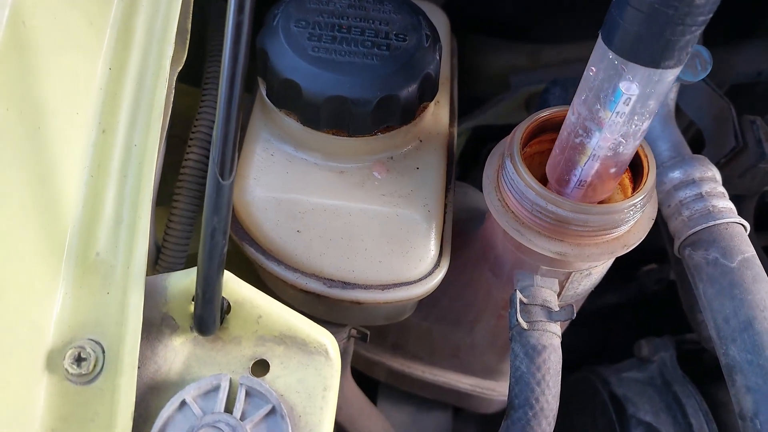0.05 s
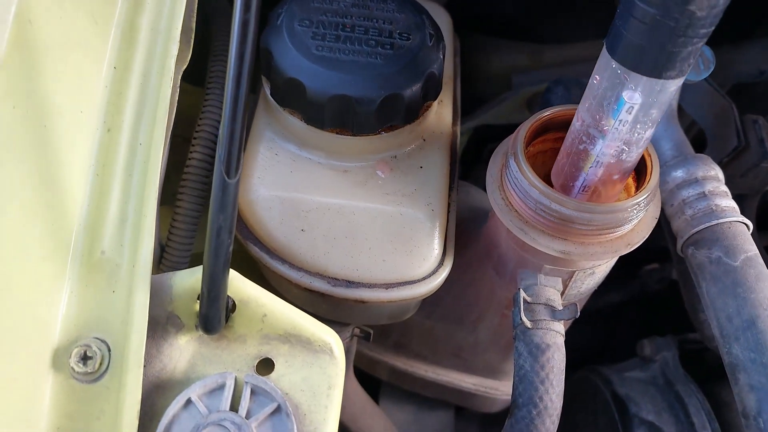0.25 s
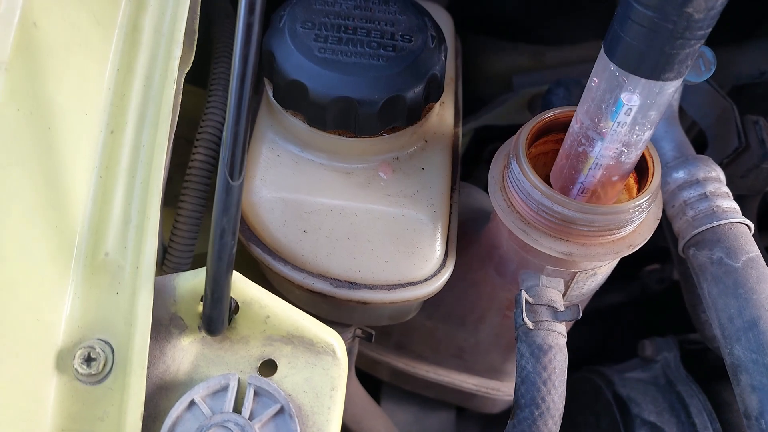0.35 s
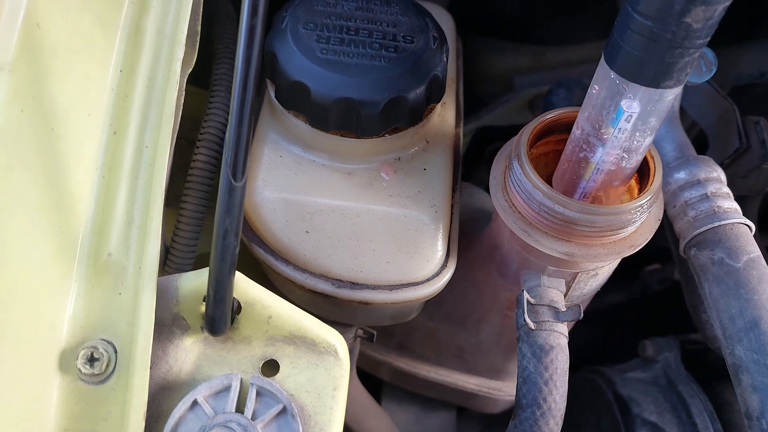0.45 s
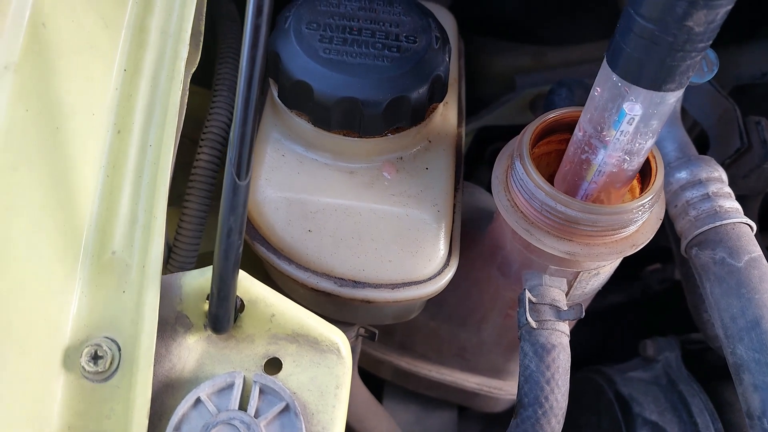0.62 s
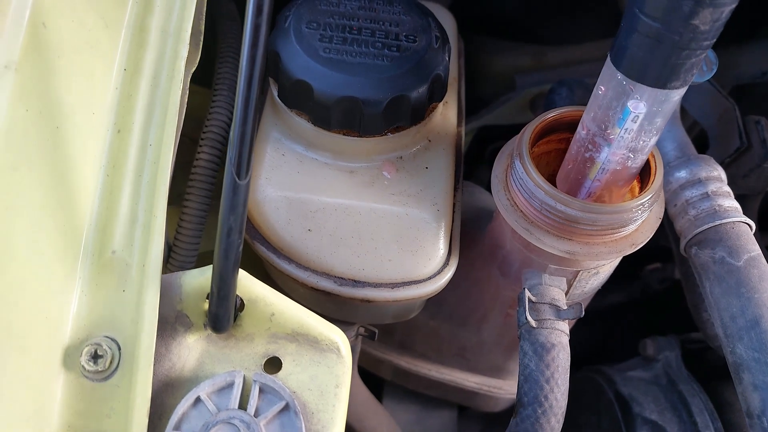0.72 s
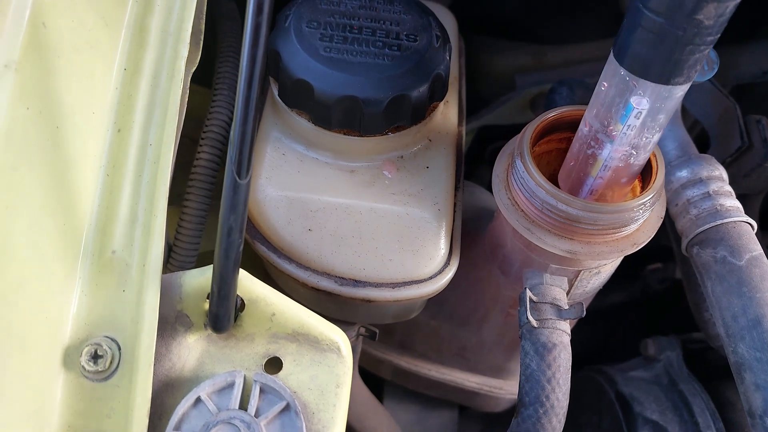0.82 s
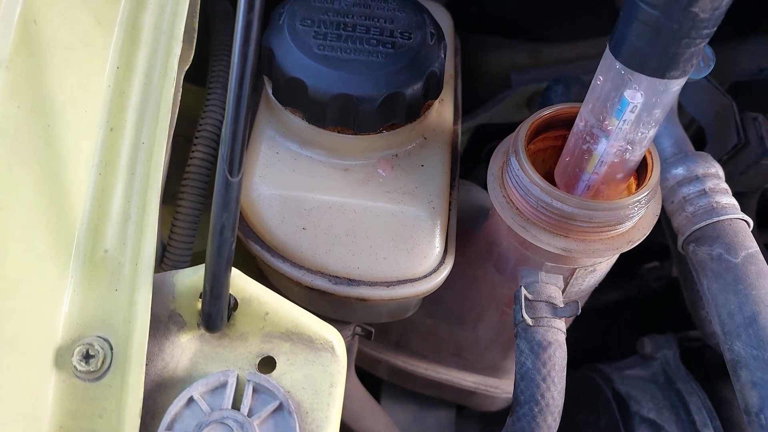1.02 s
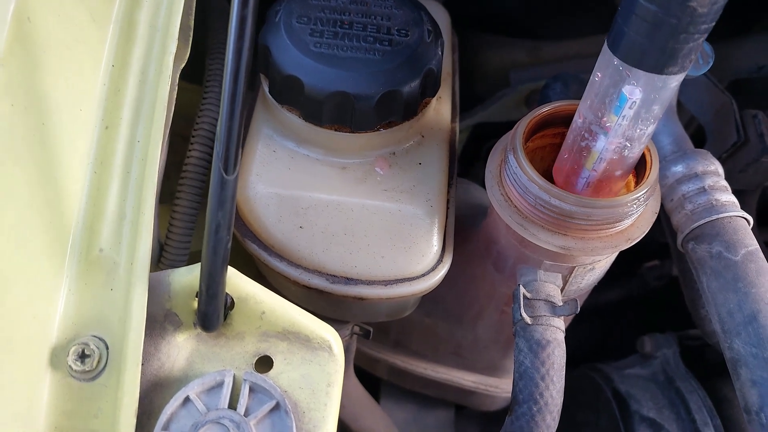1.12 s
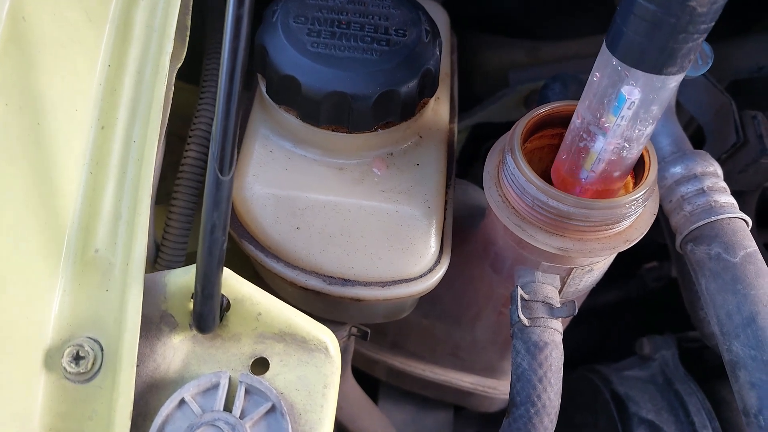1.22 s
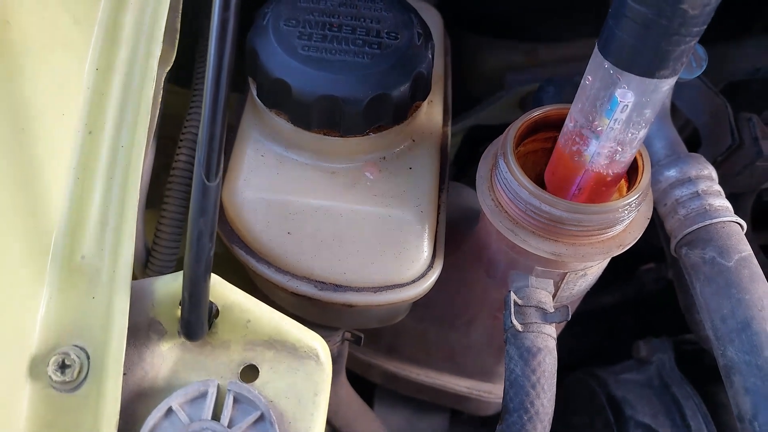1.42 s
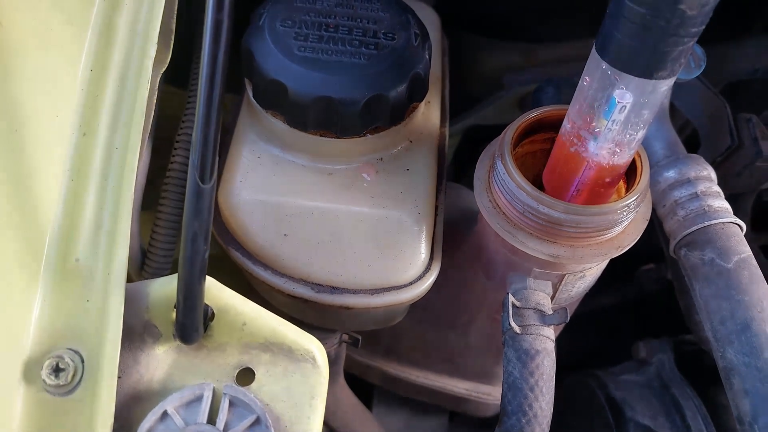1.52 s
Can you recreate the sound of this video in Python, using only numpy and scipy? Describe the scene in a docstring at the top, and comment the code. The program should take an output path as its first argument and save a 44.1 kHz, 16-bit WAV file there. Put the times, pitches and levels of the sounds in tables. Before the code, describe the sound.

Close by in a quiet garage, air hisses softly and a tube gives a quick cluster of hollow knocks on a plastic tank. Liquid ticks and pops over softly drawn air, ending in a faint fluttering whistle.

```python
"""A clear filling tube is worked in the neck of a car's plastic coolant tank, in a quiet garage.
Air hisses out of the tube; from 0.23 s the tube knocks and rattles on the tank, ringing its walls.
From 0.45 s the wet tube ticks and crackles and bubbles pop, over a soft rush of air drawn in.
From 1.19 s, as the coolant climbs the tube, a thin whistle flutters through a wet gap.
Faint rubbing, room noise and a low hum lie under it all."""
import sys
import numpy as np
from scipy import signal
from scipy.fft import rfft, irfft
from scipy.io import wavfile

SR = 44100
rng = np.random.default_rng(int(sys.argv[2]) if len(sys.argv) > 2 else 0)


def digitize_waveform(pressure):
    """Quantize a signal to 16-bit integers and store it at the path in sys.argv[1].

    Rows of a 2-D input are taken as channels; values are limited to [-1, 1].
    """
    field = np.atleast_2d(pressure).T
    bounded = np.clip(field, -1, 1)
    quanta = np.round(bounded * 32767).astype(np.int16)
    wavfile.write(sys.argv[1], SR, quanta)


N = 68355
TIME = np.arange(N) / SR
BINS_HZ = np.maximum(np.arange(N // 2 + 1) * SR / N, 1)
TICK_ATTACK_S = 0.0015
TUBE_PAN_DB, SPIT_PAN_DB = 12.5, 3.5

# air drawn through the tube: t/s, level/dB
RUSH_LEVEL = [(.22, -71), (.30, -64.5), (.62, -62), (.76, -71.5), (.97, -87), (1.17, -78.5), (1.27, -78),
              (1.55, -77.5)]
# leftward lean of hiss and room noise: f/Hz, left minus right/dB
LEAN = [(60, 11.5), (150, 12), (700, -3), (2400, 13.5), (5000, 1.5), (8500, 5), (15000, -4)]


def knocks():
    """Each contact of tube and tank gives a thud, a wall ring, a clack and a short crack."""
    # contacts: t/s, thud/dB, wall ring/dB, clack/dB, crack/dB
    contacts = [(0.227, -22.5, -56, -44, -35), (0.2335, -38, -33.5, -33, -42.5),
                (0.2476, -33, -47, -41, -37), (0.2535, -22, -36.5, -35, -64),
                (0.2666, -21.5, -60, -46, -52), (0.287, -29, -45, -44, -56), (0.2950, -26, -62, -52, -64),
                (0.3844, -42, -48, -55, -83), (0.5235, -43, -68, -64, -92), (0.7990, -53, -76, -74, -75)]
    # clack spectrum: f/Hz, density/dB
    clack_colour = [(100, -34), (700, -20), (1000, -10), (1300, -13), (1850, 1.5), (2250, -2.5),
                    (2600, -14), (5000, -36)]
    # crack spectrum: f/Hz, density/dB
    crack_colour = [(1500, -6.5), (3200, 11), (4300, -1), (5000, 11), (5900, 1.5), (6700, 9.5), (9000, 2),
                    (10800, 6.5), (12000, -4), (16000, -3)]
    attack_s, crack_ring_hz, crack_width_hz = 0.0019, 12810, 110
    times_s, thud_db, wall_db, clack_db, crack_db = np.transpose(contacts)
    body = pan(0.8) * tank_thud(times_s, thud_db) + pan(5.5) * wall_ring(times_s, wall_db)
    clack = bursts(times_s, clack_db - 3, attack_s, t60_s=0.11) * broad_noise(clack_colour)
    bright = broad_noise(crack_colour)
    bright += from_db(-7.5) * resonant_noise([(crack_ring_hz, crack_width_hz, 0)])
    crack = bursts(times_s, crack_db, attack_s, t60_s=0.053) * bright
    return body + (pan(9) * clack + pan(4) * crack) * grain()


def tank_thud(times_s, levels_db):
    """Soft pushes ring the tank's low modes; the plastic starts a little sharp, then sags."""
    # tank modes: f/Hz, level/dB, t60/s
    modes = [(60.7, -18, 0.32), (125.1, -11, 0.24), (173.6, -15.5, 0.33), (199, -27, 0.37),
             (222, -2.5, 0.067), (241.2, -4, 0.15), (276.8, 4.5, 0.21), (329, -14.5, 0.42)]
    contact_s, sag_share, sag_s, low_cut_hz = 0.0023, 0.024, 0.076, 144.5
    force = np.zeros(N)
    for start_s, db in zip(times_s, levels_db):
        age_s = np.maximum(TIME - start_s, 0)
        push = age_s * np.exp(-2 * age_s / contact_s)
        force += 2 * from_db(db) * push / push.sum()
    clock_s = TIME + sag_share * (sag_s * (1 - np.exp(-TIME / sag_s)) - TIME / 2)
    thud = signal.fftconvolve(force, ring(modes, TIME, clock_s))[:N]
    return butterworth(thud, low_cut_hz, "high")


def wall_ring(times_s, levels_db):
    """Contacts ring the walls; the leaning tube flattens and damps their modes."""
    # wall and neck modes: f/Hz, level/dB, t60/s
    modes = [(546, 5, 0.075), (598, -4, .11), (672, -10, 0.13), (850, -.5, 0.135), (1120, -13, 0.14),
             (1490, -5.5, 0.054), (1756, -7.5, 0.074), (1939, -12, 0.084)]
    # pressure of the tube on the neck: t/s, share/1
    press_curve = [(.24, 0), (.29, .95), (.36, .95), (.38, 0)]
    flattening, damping, high_cut_hz = 0.042, 0.4, 1470
    press = np.interp(TIME, *np.transpose(press_curve))
    out = np.zeros(N)
    for start, db in zip((times_s * SR).astype(int), levels_db):
        span = slice(start, start + SR // 2)
        clock_s = np.cumsum(1 - flattening * press[span]) / SR
        age_s = np.cumsum(1 + damping * press[span]) / SR
        out[span] += from_db(db) * ring(modes, age_s, clock_s)
    return butterworth(out, high_cut_hz, "low")


def ticks():
    """Each wet tick is a bright spit that rings briefly in the tube."""
    # wet ticks: t/s, low ring/dB, high ring/dB, spit/dB
    events = [(0.4637, -46, -52.5, -57.5), (0.478, -45.5, -47.5, -55), (0.5168, -52, -53, -53),
              (0.5552, -46.5, -48, -68), (0.598, -48.5, -57, -59), (0.63, -78, -54.5, -55),
              (0.6705, -53.5, -59, -49), (0.675, -48.5, -55, -49), (0.697, -53.5, -46, -54.5),
              (0.704, -53.5, -44, -49), (0.7126, -56, -49, -49), (0.7489, -61, -47, -53.5),
              (0.762, -63, -50.5, -56), (0.7758, -66, -62, -57), (0.8090, -65, -62, -52),
              (0.827, -71, -66, -54.5), (0.8413, -67.5, -60.5, -53.5), (0.987, -86.5, -96, -59),
              (1.092, -83, -73, -56.5), (1.1173, -95, -73, -55), (1.1283, -93, -73, -58)]
    # lower air resonances of the tube: f/Hz, width/Hz, level/dB
    low_modes = [(1665, 410, 3.5), (1948, 44, 1.5), (2211, 41, -1.5)]
    # upper air resonances of the tube: f/Hz, width/Hz, level/dB
    high_modes = [(2590, 170, -4.5), (2882, 27, 0), (3276, 360, 4.5), (3910, 360, -10), (4830, 280, -1.5)]
    times_s, low_db, high_db, spit_db = np.transpose(events)
    low = bursts(times_s, low_db - 4.5, TICK_ATTACK_S, t60_s=0.089) * resonant_noise(low_modes)
    high = bursts(times_s, high_db - 1, TICK_ATTACK_S, t60_s=0.05) * resonant_noise(high_modes)
    return pan(TUBE_PAN_DB) * (low + high) + pan(SPIT_PAN_DB) * spits(times_s, spit_db)


def spits(times_s, levels_db):
    """Grainy treble bursts, each with its own random colour."""
    # mean spit spectrum: f/Hz, density/dB
    colour = [(3000, -12), (5500, -5.5), (7800, 0.5), (9400, -6), (11500, -5.5), (16000, -17)]
    spectrum = from_db(at_hz(colour))
    centres_hz = np.geomspace(3000, 15000, num=9)
    width_octaves = np.log2(centres_hz[1] / centres_hz[0]) / 1.5
    out = 0
    for hz in centres_hz:
        band = np.exp(-(np.log2(BINS_HZ / hz) / width_octaves) ** 2) * spectrum
        share = np.sqrt(np.sum(band ** 2) / np.sum(spectrum ** 2))
        band_db = levels_db + rng.uniform(-4, 4, len(times_s))
        out += share * bursts(times_s, band_db, TICK_ATTACK_S, t60_s=0.027) * stereo_noise(band)
    return out * grain()


def pops():
    """Larger bubbles burst, each ringing on one pitch in the tube."""
    # bubbles: t/s, f/Hz, level/dB
    bubbles = [(.549, 1530, -53.5), (.558, 1709, -45), (.598, 1974, -54.5), (.712, 1960, -53),
               (.8895, 3010, -68)]
    t60_s = 0.059
    out = 0
    for start_s, hz, db in bubbles:
        age_s = np.maximum(TIME - start_s, 0)
        out += from_db(db - 60 * age_s / t60_s) * np.sin(2 * np.pi * hz * age_s)
    return pan(TUBE_PAN_DB) * out


def hiss():
    """Air blown out through the tube's resonances."""
    # outflow: t/s, level/dB
    envelope = [(0, -56), (.05, -55), (.12, -56), (.22, -59), (.26, -55), (.31, -77), (.36, -130)]
    # hiss spectrum: f/Hz, density/dB
    colour = [(600, -12.5), (1100, -36), (2700, -10), (3600, 1.5), (5800, -2), (7400, -2.5), (12000, -2.5),
              (16000, 0)]
    # tube resonances: f/Hz, width/Hz, level/dB
    modes = [(1703, 220, 0.5), (1933, 19, -9), (3110, 70, -4), (3490, 94, -7), (3870, 68, -14)]
    noise = broad_noise(colour, at_hz(LEAN)) + pan(11) * from_db(-5) * resonant_noise(modes)
    return level(envelope) * noise


def whistle():
    """Air whistles and rasps through an unevenly fluttering wet gap; pitch falls in each opening."""
    # rasp of the gap: f/Hz, width/Hz, level/dB
    rasp_modes = [(2130, 220, -2.5), (2530, 250, 1.5), (3170, 310, -9), (4110, 460, -7)]
    start_s, swell_s = 1.19, 0.016
    peak_s, period_s, depth_db, rough_db = 1.2007, 0.0273, 15, 1.3
    centre_hz, fall_hz, wobble_hz = 2563, 249, 22
    cycle = (TIME - peak_s) / period_s + 0.02 * drift(rate_hz=30)
    hz = centre_hz - fall_hz * ((cycle + 0.5) % 1 - 0.5) + wobble_hz * drift(rate_hz=150)
    swell = 1 - np.exp(-np.maximum(TIME - start_s, 0) / swell_s)
    opening_db = -depth_db * np.sin(np.pi * cycle) ** 2 + rough_db * drift(rate_hz=240)
    tone = from_db(opening_db) * np.sin(2 * np.pi * np.cumsum(hz) / SR)
    rasp = from_db(-14 + 0.4 * opening_db) * resonant_noise(rasp_modes)
    return pan(9) * from_db(-56) * swell * (tone + rasp)


def rush():
    """Air drawn in through the tube, duller than the hiss."""
    # rush spectrum: f/Hz, density/dB
    colour = [(450, -3.5), (1200, -7.5), (2100, -1), (4400, -7.5), (5900, -33), (12000, -69)]
    # tube resonances: f/Hz, width/Hz, level/dB
    modes = [(2000, 280, -1), (3210, 190, -11), (4080, 130, 1), (4974, 85, -4.5)]
    noise = broad_noise(colour) + from_db(-7.5) * resonant_noise(modes)
    return pan(6.5) * level(RUSH_LEVEL) * noise


def rub():
    """The sliding tube scrapes over the wet rim and faintly stirs the tank."""
    # scrape on the rim: t/s, level/dB
    scrape_level = [(.42, -110), (.465, -75.5), (.72, -75.5), (.86, -115)]
    # scrape spectrum: f/Hz, density/dB
    scrape_colour = [(2500, -5), (5000, -0.5), (9000, 3.5), (14000, -30)]
    # tank murmur: t/s, level/dB
    murmur_level = [(0, -69), (.13, -64), (.2, -59.5), (.42, -59.5), (.62, -80), (.75, -76.5), (1.3, -80.5),
                    (1.46, -68.5), (1.55, -77.5)]
    # tank resonances: f/Hz, width/Hz, level/dB
    murmur_modes = [(143.6, 23, -0.5), (260, 110, -5.5), (832, 64, -15.5)]
    scrape = level(scrape_level) * broad_noise(scrape_colour) * grain()
    murmur = level(murmur_level) * resonant_noise(murmur_modes)
    return pan(SPIT_PAN_DB) * scrape + pan(8) * murmur


def squeaks():
    """Air slips through a liquid film in a short falling tone."""
    # small bubbles: t/s, f/Hz, level/dB
    bubbles = [(0.647, 14400, -62), (1.057, 3870, -66.5)]
    half_width_s, fall_octaves_per_s, wobble_share = 0.0069, 10, 0.04
    out = 0
    for peak_s, hz, db in bubbles:
        glide_hz = hz * 2 ** (-fall_octaves_per_s * (TIME - peak_s))
        glide_hz *= 1 + wobble_share * drift(rate_hz=690)
        envelope = from_db(db) * np.exp(-((TIME - peak_s) / half_width_s) ** 2)
        out += envelope * np.sin(2 * np.pi * np.cumsum(glide_hz) / SR)
    return pan(TUBE_PAN_DB) * out


def fizz():
    """Tiny drips and films burst at random, louder while the air rushes."""
    start_s, rate_per_s, spread_db = 0.45, 140, 6
    born = (rng.random(N) < rate_per_s / SR) & (TIME > start_s)
    levels_db = -74 + spread_db * rng.standard_normal(N)
    flow = rms_one(level(RUSH_LEVEL)) ** 0.26
    return pan(SPIT_PAN_DB) * flow * spits(TIME[born], levels_db[born])


def garage(sound):
    """Faint reverberation, room noise and a low hum."""
    # room noise spectrum: f/Hz, density/dB
    colour = [(20, -15), (80, 3), (140, -10), (190, -7), (270, -9), (450, -15), (2500, -31), (8000, -25.5),
              (16000, -31)]
    t60_s, low_hz, high_hz, hum_hz = 0.33, 150, 1900, 137.9
    tail = rng.standard_normal((2, N)) * from_db(-60 * TIME / t60_s)
    tail = butterworth(tail / np.sqrt(np.sum(tail[0] ** 2)), [low_hz, high_hz], "band")
    reverb = from_db(-24) * signal.fftconvolve(sound, tail, axes=1)[:, :N]
    noise = from_db(-69.5) * broad_noise(colour, at_hz(LEAN))
    hum = pan(6.5) * from_db(-76) * rms_one(np.sin(2 * np.pi * hum_hz * TIME))
    return reverb + noise + hum


def from_db(db):
    """Decibels to gain."""
    return 10 ** (np.asarray(db) / 20)


def rms_one(x):
    """Scale to rms 1."""
    return x / np.sqrt(np.mean(x ** 2) + 1e-20)


def pan(db):
    """Stereo gains for left minus right in dB."""
    gains = from_db([[db / 2], [-db / 2]])
    return gains / gains.mean()


def level(curve):
    """Gain along a (t/s, level/dB) curve."""
    return from_db(np.interp(TIME, *np.transpose(curve)))


def at_hz(points):
    """A (f/Hz, value) table read at every bin, on a log axis."""
    hz, value = np.transpose(points)
    return np.interp(np.log(BINS_HZ), np.log(hz), value)


def butterworth(x, hz, kind):
    """Filter with 12 dB/octave slopes."""
    return signal.sosfilt(signal.butter(2, hz, kind, fs=SR, output="sos"), x)


def stereo_noise(gain):
    """Noise with a gain per bin, less alike left and right in the treble; rms 1."""
    # left-right likeness: f/Hz, correlation/1
    likeness = [(30, 0.27), (300, 0.31), (4000, 0.096)]
    alike = at_hz(likeness)
    mid, side = rfft(rng.standard_normal((2, N)))
    spectrum = np.sqrt(1 + alike) * mid + np.sqrt(1 - alike) * side * [[1], [-1]]
    return rms_one(irfft(gain * spectrum, N))


def broad_noise(colour, lean_db=0):
    """Noise of a broad colour; positive lean is to the left."""
    return stereo_noise(from_db(at_hz(colour) + lean_db * np.array([[0.5], [-0.5]])))


def resonant_noise(modes):
    """Noise in steep-sided resonances."""
    return stereo_noise(sum(from_db(db) / np.sqrt(width_hz) / (1 + (2 * (BINS_HZ - hz) / width_hz) ** 2)
                            for hz, width_hz, db in modes))


def drift(rate_hz):
    """Low-passed random wander, rms 1."""
    return rms_one(irfft(rfft(rng.standard_normal(N)) / (1 + (BINS_HZ / rate_hz) ** 2), N))


def grain(spread_db=2.5):
    """Fast uneven gain that makes noise crackle."""
    return rms_one(from_db(spread_db * drift(rate_hz=1200)))


def bursts(times_s, levels_db, attack_s, t60_s):
    """Envelope of fast-rising, decaying bursts, summed in power."""
    clicks = np.bincount((times_s * SR).astype(int), from_db(levels_db), N)[:N]
    shape = (1 - np.exp(-TIME / attack_s)) * from_db(-60 * TIME / t60_s)
    return np.sqrt(np.abs(signal.fftconvolve(clicks ** 2, shape ** 2)[:N]))


def ring(modes, age_s, clock_s):
    """Damped modes; age drives the decay, clock the phase."""
    return sum(from_db(db - 60 * age_s / t60_s) * np.cos(2 * np.pi * hz * clock_s)
               for hz, db, t60_s in modes)


def scene():
    """Tube and tank, close by and a little to the left, in the garage."""
    near = knocks() + rub() + ticks() + pops() + squeaks() + fizz() + hiss() + rush() + whistle()
    return near + garage(near)


def record(dry):
    """Steep treble cut."""
    cutoff_hz = 15850
    return signal.sosfilt(signal.ellip(12, 0.1, 80, cutoff_hz, fs=SR, output="sos"), dry)


dry = scene()
out = record(dry)
digitize_waveform(out)
```